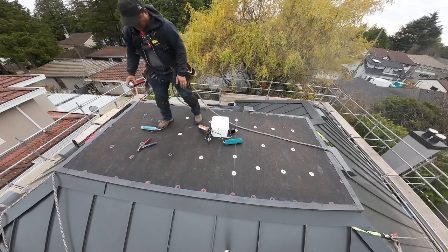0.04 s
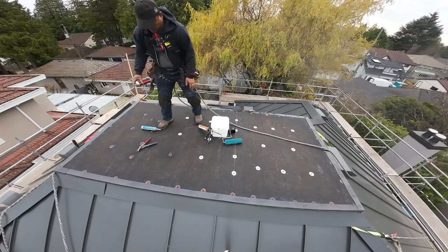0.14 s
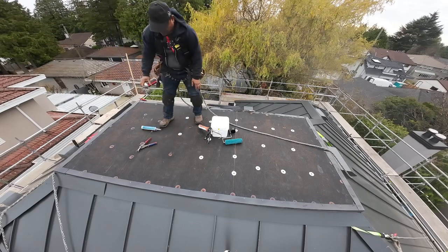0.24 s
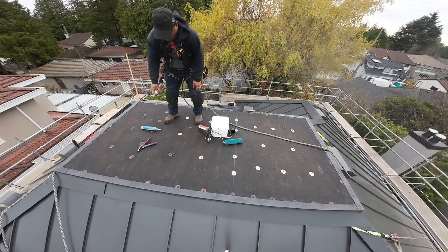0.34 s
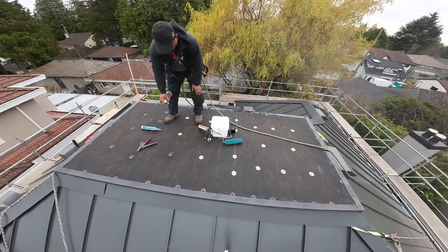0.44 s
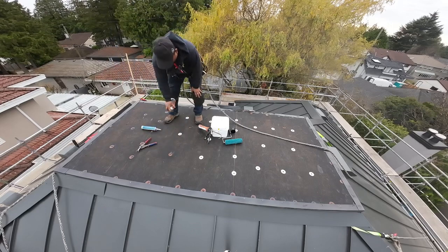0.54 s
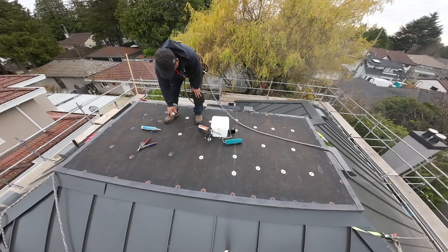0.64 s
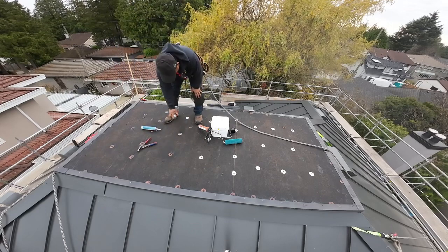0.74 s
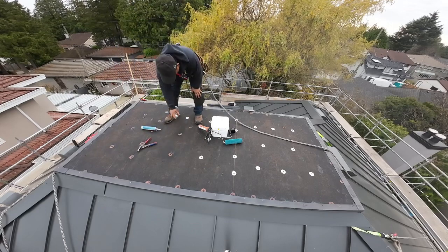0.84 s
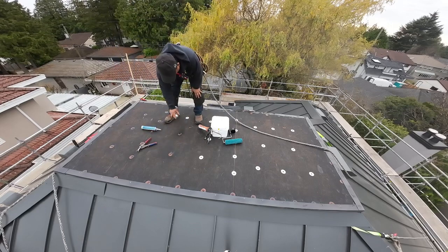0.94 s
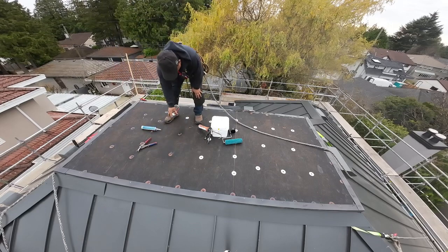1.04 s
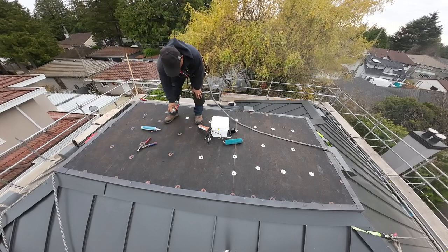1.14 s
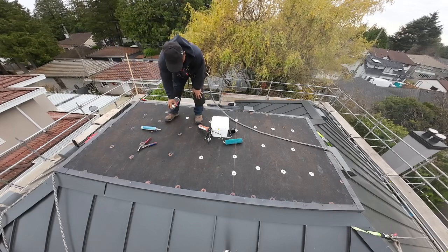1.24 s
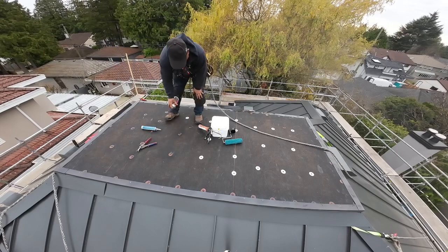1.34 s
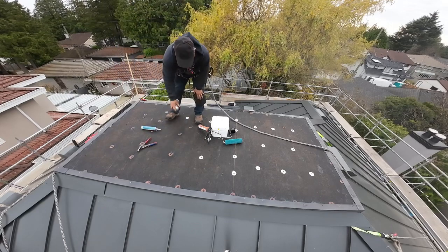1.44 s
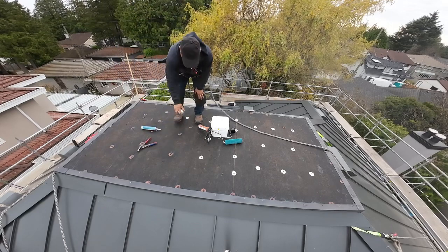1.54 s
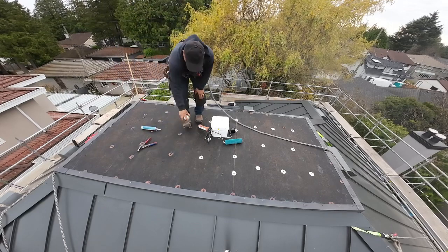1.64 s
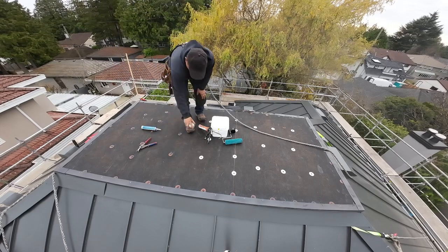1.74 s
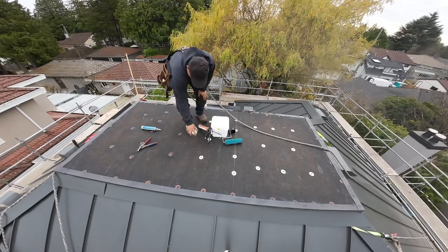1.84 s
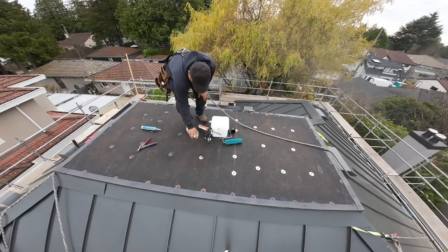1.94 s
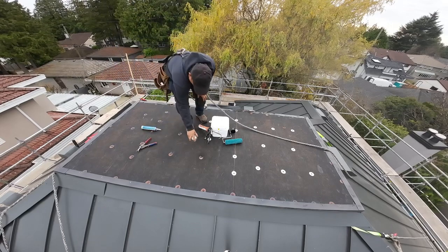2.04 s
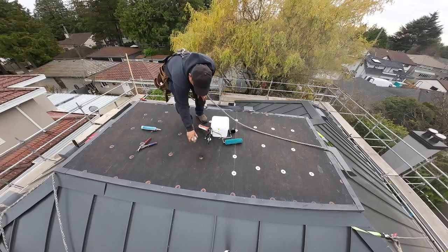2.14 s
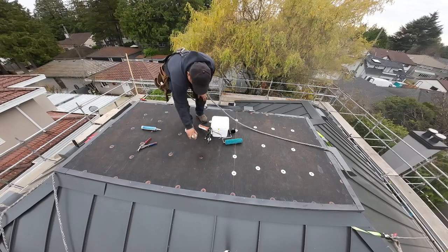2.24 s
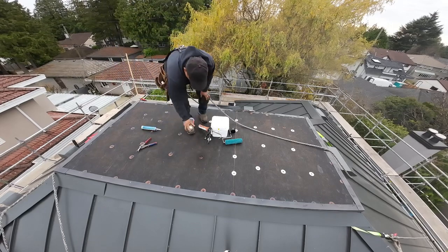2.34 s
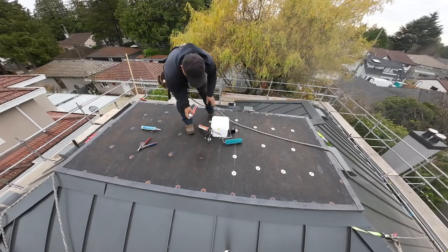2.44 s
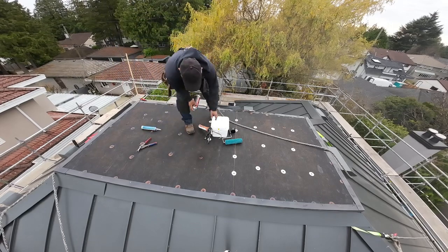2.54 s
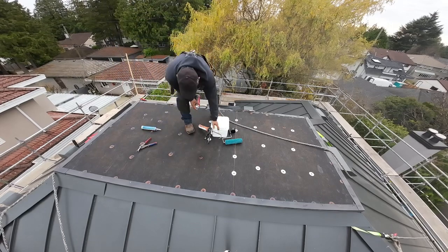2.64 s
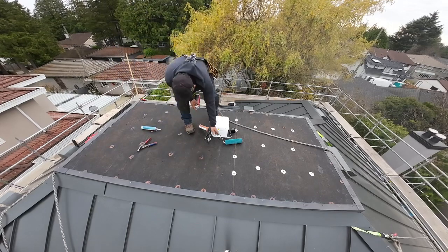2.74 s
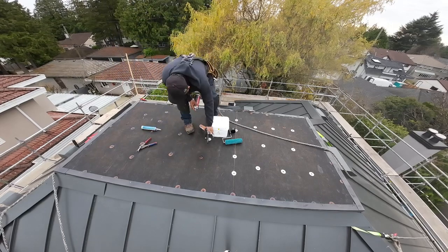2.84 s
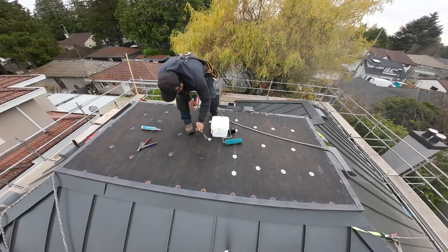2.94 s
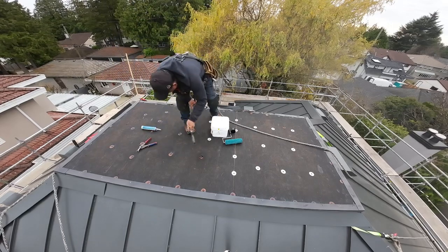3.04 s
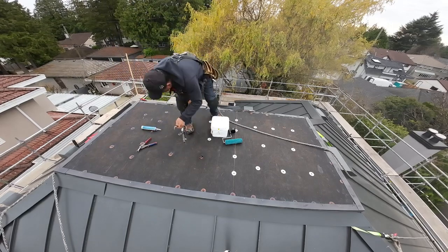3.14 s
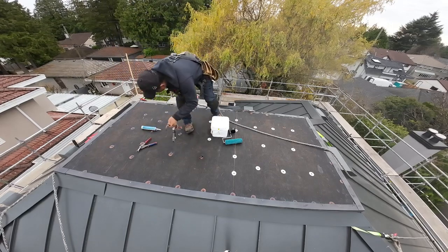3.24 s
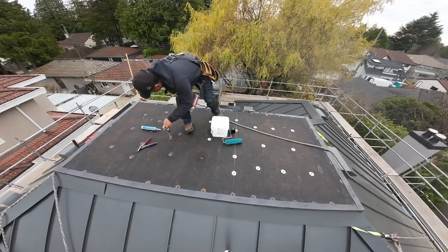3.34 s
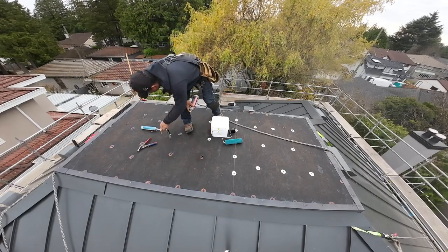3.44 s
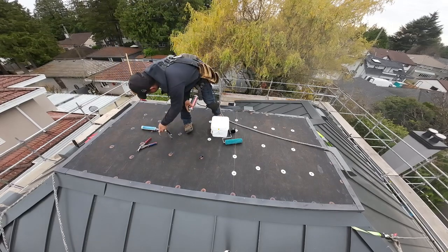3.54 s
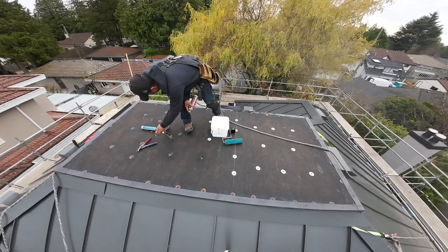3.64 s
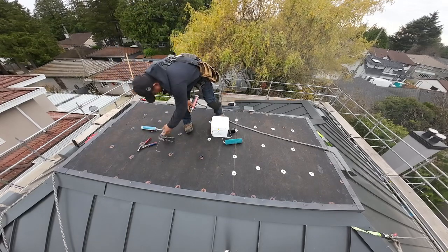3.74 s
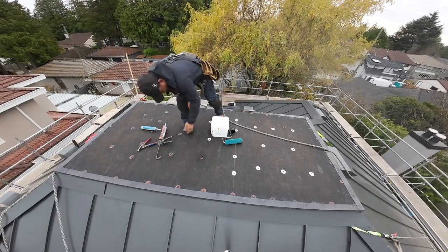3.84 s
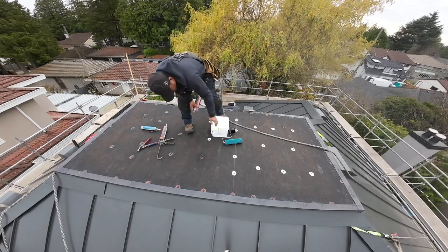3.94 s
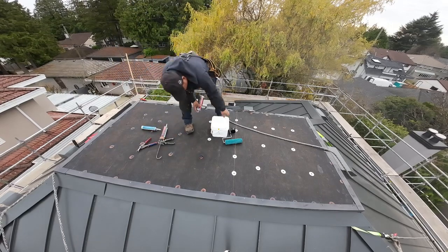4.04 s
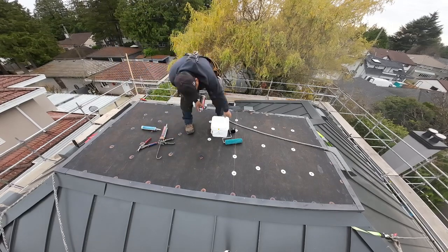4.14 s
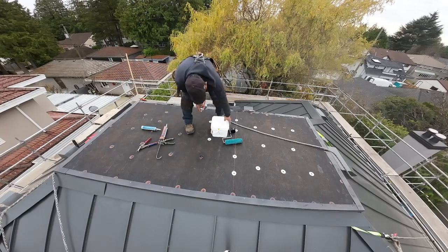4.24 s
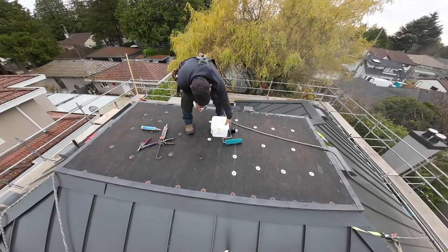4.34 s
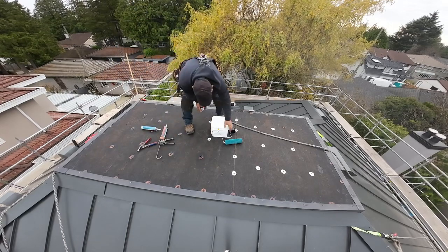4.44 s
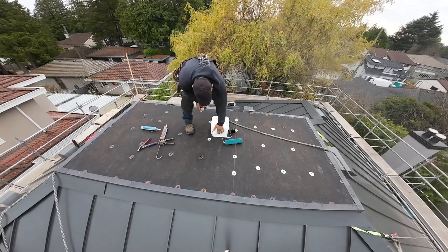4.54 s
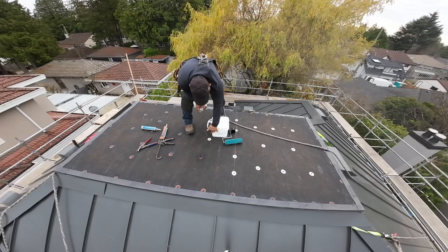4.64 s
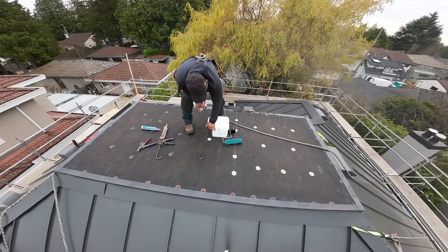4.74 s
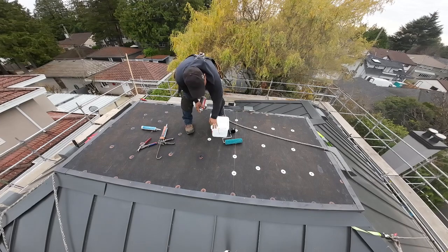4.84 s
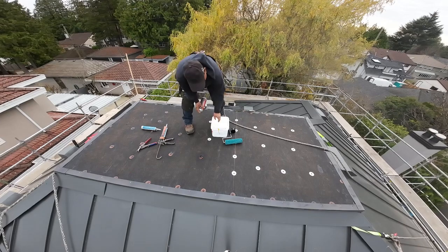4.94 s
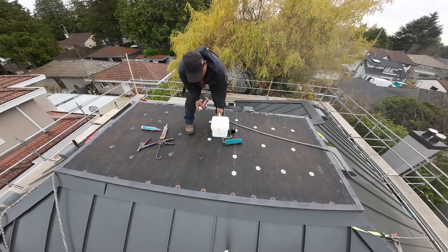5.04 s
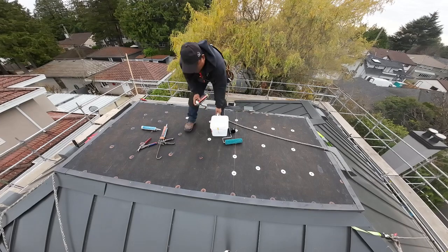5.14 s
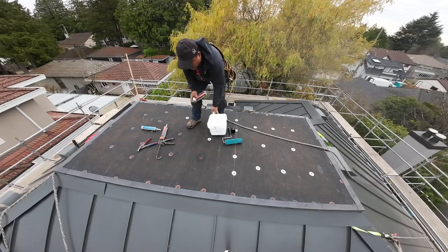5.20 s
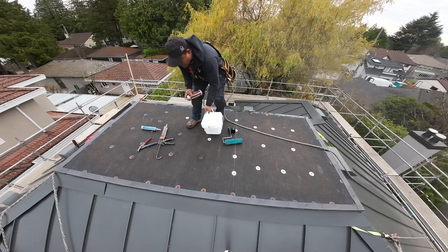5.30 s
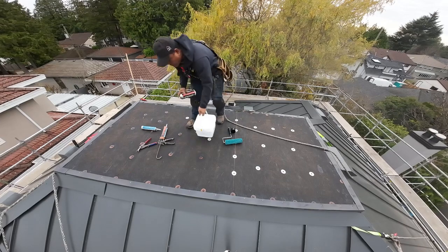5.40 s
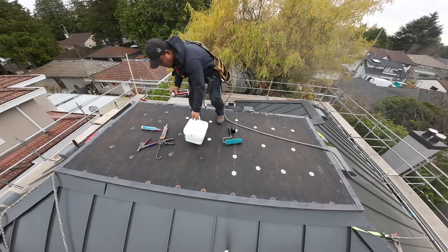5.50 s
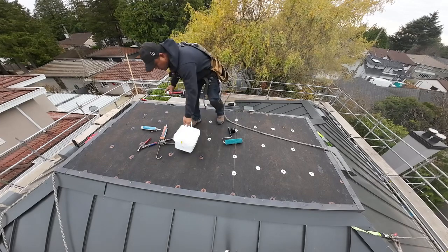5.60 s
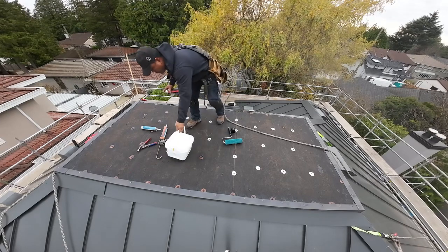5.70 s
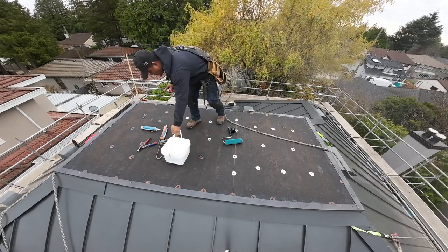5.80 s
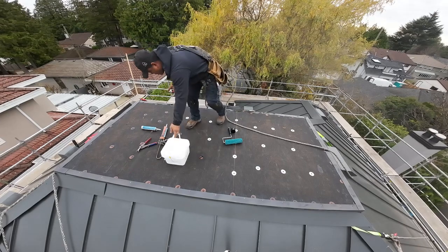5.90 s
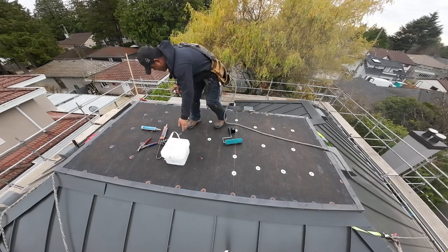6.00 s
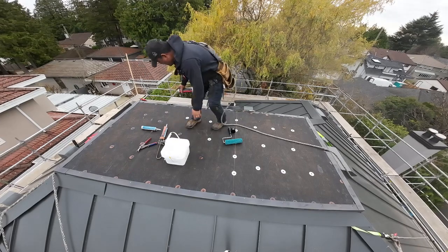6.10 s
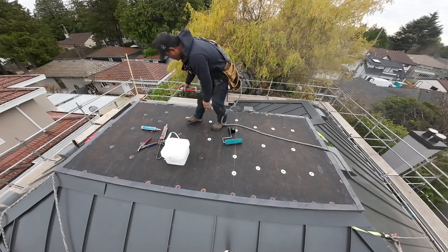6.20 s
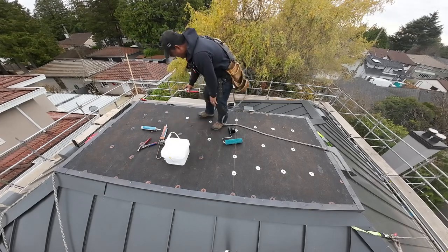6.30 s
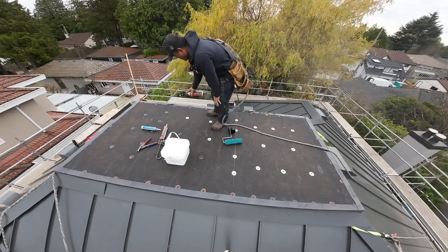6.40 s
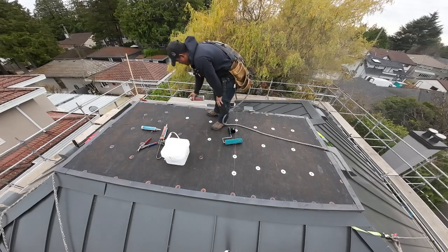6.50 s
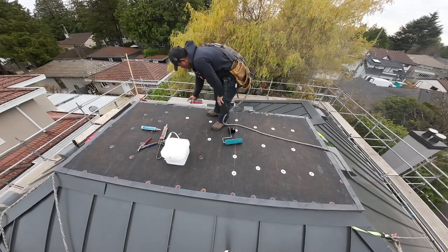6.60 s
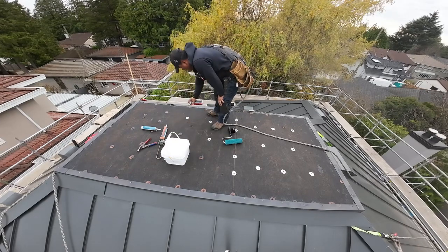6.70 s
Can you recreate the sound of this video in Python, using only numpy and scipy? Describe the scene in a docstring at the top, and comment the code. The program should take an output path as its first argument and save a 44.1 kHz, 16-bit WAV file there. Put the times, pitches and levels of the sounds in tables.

```python
"""A flat felt roof above a town: traffic rumble (shaped noise) and faint machine hum (wavering sines). A
roofer's boots and gear scuff (grainy noise), boots knock a board, steel tools clink (rough tones). A spray can
hisses in short bursts: noise combed by echoes off the roof and the roofer's hand and body. A tool drops and
bounces, and a plastic jug is lifted and set down: friction noise plus damped modes."""
import sys
import numpy as np
from scipy import signal
from scipy.fft import rfft, irfft, next_fast_len
from scipy.io import wavfile
from scipy.ndimage import uniform_filter1d, map_coordinates

SR = 44100
rng = np.random.default_rng(int(sys.argv[2]) if len(sys.argv) > 2 else 0)


def digitize_waveform(pressure):
    """Quantize a signal to 16-bit integers and store it at the path in sys.argv[1].

    Rows of a 2-D input are taken as channels; values are limited to [-1, 1].
    """
    field = np.atleast_2d(pressure).T
    bounded = np.clip(field, -1, 1)
    quanta = np.round(bounded * 32767).astype(np.int16)
    wavfile.write(sys.argv[1], SR, quanta)


N = 298116


def amp(db):
    """Decibels to linear gain."""
    return 10 ** (np.asarray(db) / 20)


def unit(x):
    """Scale to rms 1."""
    return x / np.sqrt(np.mean(x ** 2) + 1e-20)


def clock():
    """Sample times in seconds."""
    return np.arange(N) / SR


def along(points, hz):
    """Interpolate (Hz, value) points on a log frequency axis."""
    point_hz, value = np.transpose(points)
    return np.interp(np.log(hz + 1), np.log(point_hz + 1), value)


def wobble(knots_per_s):
    """Smooth random curve through normally distributed knots."""
    knots = rng.standard_normal(int(N * knots_per_s / SR) + 4)
    return map_coordinates(knots, [np.arange(N) * knots_per_s / SR])


def filtered(x, response):
    """Multiply the spectrum of x by a function of frequency."""
    size = next_fast_len(N + SR // 4)
    spectrum = rfft(x, size) * response(np.fft.rfftfreq(size, 1 / SR))
    return irfft(spectrum, size)[..., :N]


# stereo width: freq_hz, side_minus_mid_db
STEREO_WIDTH = [(25, -17), (70, -18), (140, -27.5), (320, -36.5), (850, -27.5), (2000, -29.5), (4000, -14),
                (7000, -14), (10500, -7)]


def noise(spectrum, grain_db=0, patchy_db=0):
    """Stereo noise, rms 1: grain_db clumps it into tiny slips, patchy_db gives passing colours."""
    z = signal.stft(rng.standard_normal((2, N)), nperseg=512)[2]
    field = uniform_filter1d(rng.standard_normal(z.shape[1:]), size=3, axis=0)
    field = uniform_filter1d(field, size=9, axis=1)
    pair = signal.istft(z * amp(patchy_db * unit(field)), nperseg=512)[1][:, :N]
    pair = pair * amp(grain_db * wobble(400))

    def mid_side_gains(hz):
        angle = np.arctan(amp(along(STEREO_WIDTH, hz)))
        return amp(along(spectrum, hz)) * [np.cos(angle), np.sin(angle)]

    mid, side = filtered(pair, mid_side_gains)
    return unit(np.array([mid + side, mid - side]))


def add(track, start_s, sound):
    """Mix a sound into a track, cut at the track's end."""
    part = track[round(start_s * SR):][:len(sound)]
    part += sound[:len(part)]


def ring(modes, scatter_db):
    """Half a second of damped modes kicked together, strengths redrawn on each call."""
    t = np.arange(SR // 2) / SR
    return sum(amp(db + scatter_db * rng.normal() - 60 * t / t60_s) * np.cos(2 * np.pi * hz * t)
               for hz, db, t60_s in modes)


def blows(hits, modes):
    """Impacts on a modal body; a longer contact pulse excites the high modes less."""
    track = np.zeros(N)
    for start_s, db, contact_s in hits:
        push = np.hanning(max(int(contact_s * SR), 3))
        struck = signal.fftconvolve(ring(modes, scatter_db=1), push / push.sum())
        add(track, start_s, amp(db) * struck)
    return track


def pressure(rows, rise, fall):
    """Contact force: exponential swell and fade, time constants as shares of length_s; powers add."""
    t, power = clock(), np.zeros(N)
    for peak_s, db, length_s in rows:
        near = slice(max(int((peak_s - 4 * length_s) * SR), 0), int((peak_s + 6 * length_s) * SR))
        u = (t[near] - peak_s) / length_s
        envelope = amp(db) * np.exp(np.where(u < 0, u / rise, -u / fall))
        power[near] += envelope ** 2
    return np.sqrt(power)


def scraped(force, modes, spread):
    """Rough contact: noise under the force keeps kicking the modes; spread is the side share."""
    body = ring(modes, scatter_db=1.5)
    kicks = force * rng.standard_normal((2, N))
    mid, side = signal.fftconvolve(kicks, body[None] / np.linalg.norm(body), axes=1)[:, :N]
    return np.array([mid + spread * side, mid - spread * side])


# rasp, grit and hollow body of felt friction: freq_hz, relative_db
FELT_RASP = [(500, -47), (1100, -2), (1600, 1.5), (2600, 2), (3800, -0.5), (4700, -9), (6500, -13),
             (11000, -61)]
FELT_GRIT = [(2500, -33), (4500, 2), (6000, 7), (8000, 3.5), (10500, 5), (12000, -5.5)]
FELT_BODY = [(120, -33), (300, 9.5), (480, 4.5), (650, 0), (950, 3), (1300, 3), (1700, -7), (3000, -37)]


def friction(rows, grit_db, body_db, rise, fall, grain_db, patchy_db):
    """Contact on mineral felt: mid rasp, grit above, hollow body below, under shared pressure."""
    peak_s, db, length_s = np.transpose(rows)[:3]
    total = 0
    for extra_db, colour in ((0, FELT_RASP), (grit_db, FELT_GRIT), (body_db, FELT_BODY)):
        force = pressure(zip(peak_s, db + extra_db, length_s), rise, fall)
        total = total + force * noise(colour, grain_db, patchy_db)
    return total


# town rumble: freq_hz, relative_db
TOWN_SPECTRUM = [(5, -9), (20, -8.5), (35, -3), (70, -1.5), (92, -5.5), (134, -8.5), (200, -14),
                 (332, -18.5), (423, -19.5), (538, -20), (666, -22.5), (895, -24.5), (1300, -31),
                 (1750, -40), (4700, -53.5), (10500, -59), (12000, -63), (15600, -94), (22000, -120)]
# far machines: pitch_hz, level_db, waver_hz
MACHINE_HUM = [(73, -51, 5), (298, -67, 3), (619, -62.3, 1.8), (580, -67, 4.5)]
TOWN_DB, TOWN_SWELL_DB, TOWN_SWELLS_PER_S = -43, 0.5, 2.53


def town():
    """Far traffic as slowly drifting shaped noise; machines as sines wavering in pitch and level."""
    rumble = amp(TOWN_DB + TOWN_SWELL_DB * wobble(TOWN_SWELLS_PER_S)) * noise(TOWN_SPECTRUM)
    hum = 0
    for hz, db, waver_hz in MACHINE_HUM:
        level = amp(db + 2.4 * wobble(3.5)) * np.sqrt(2)  # sine rms to peak
        phase = 2 * np.pi * np.cumsum(hz + waver_hz * wobble(25)) / SR
        hum = hum + level * np.sin(phase)
    return rumble + hum


# scattered tail: freq_hz, t60_s
YARD_DECAY = [(150, 0.88), (1000, 0.096), (4000, 0.19), (11000, 0.12)]


def yard(x):
    """Neighbouring roofs and walls scatter a thin tail: decaying noise after a 12.5 ms gap."""
    hz, t, z = signal.stft(rng.standard_normal((2, SR // 2)), SR, nperseg=256)
    decay = amp(-60 * t / along(YARD_DECAY, hz)[:, None])
    mid, side = signal.istft(z * decay, SR, nperseg=256)[1]
    tail = np.array([mid + 0.11 * side, mid - 0.068 * side]) / np.linalg.norm(mid)
    delayed_tail = np.pad(tail, ((0, 0), (SR // 80, 0)))
    return signal.fftconvolve(x, delayed_tail, axes=1)[:, :N]


# frame shudders: peak_s, level_db, length_s
JOIST_SHUDDERS = [(3.89, -33.5, 0.22), (5.96, -34, 0.15)]
# joist spectrum: freq_hz, relative_db
JOIST_SPECTRUM = [(30, -19), (60, 12.5), (100, -0.5), (190, 0.5), (300, -13), (450, -14.5), (1000, -64)]


def joists():
    """The roof's frame grumbles briefly around the heavy blows: low noise under short swells."""
    return pressure(JOIST_SHUDDERS, rise=0.23, fall=0.69) * noise(JOIST_SPECTRUM)


# microphone mount modes: freq_hz, relative_db, t60_s
MOUNT_MODES = [(34.8, -14, .6), (62.2, -8, 0.94), (80.7, -4.5, 1), (154, -14.5, 0.6)]
MOUNT_LAG_S, MOUNT_DECK_DB, MOUNT_JUG_DB = 0.0472, -17.5, -21


def mount():
    """Heavy blows cross the roof and, a moment later, rock the microphones in opposite phase."""
    deck_sway = amp(MOUNT_DECK_DB) * blows(DECK_THUMPS, MOUNT_MODES)
    jug_sway = amp(MOUNT_JUG_DB) * blows(JUG_HITS, MOUNT_MODES)
    sway = np.zeros(N)
    add(sway, MOUNT_LAG_S, deck_sway + jug_sway)
    return sway * np.array([[1], [-1]])


# boots shifting weight: peak_s, level_db, length_s
BOOT_SHUFFLES = [(2.222, -46, 0.021), (2.595, -50, 0.19), (2.72, -43, 0.034), (4.92, -50, 0.088)]
# deck under a shuffling boot: freq_hz, relative_db
HOLLOW_DECK = [(130, -17), (270, 6), (400, 0.5), (600, -2), (900, -8), (1500, -39)]
# boot on a board: peak_s, level_db, length_s
BOARD_KNOCKS = [(2.706, -46, .011), (2.727, -37.5, 0.014)]
# board modes: freq_hz, relative_db, t60_s
BOARD_MODES = [(453, 4, 0.079), (640, -12, .05), (810, 7, 0.05), (920, 1, 0.065)]


def knocks():
    """Shifting boots shuffle as hollow grainy noise and knock dully on a modal board."""
    shuffle = pressure(BOOT_SHUFFLES, rise=0.56, fall=0.46) * noise(HOLLOW_DECK, grain_db=3.0)
    knock = scraped(pressure(BOARD_KNOCKS, rise=0.4, fall=0.5), BOARD_MODES, spread=.04)
    return shuffle + knock


# rummaging: start_s, end_s, relative_db
FIDGET_SPELLS = [(.3, 0.626, -89), (1.66, 1.92, -63.5), (2.05, 2.18, -68.5), (2.85, 2.96, -65),
                 (3.08, 3.295, -63.5), (3.48, 3.658, -67), (4.32, 4.361, -64.5), (4.8, 5.13, -64.5),
                 (6.07, 6.25, -64), (6.54, 6.66, -72.5)]
FIDGETS_PER_S, FIDGET_S, FIDGET_SCATTER_DB, FIDGET_GRIT_DB = 33, 0.036, 1.8, -8
FIDGET_UNEVEN = 0.38  # timing scatter, share of the gap


def fidgets():
    """Faint scuffs, unevenly spaced through each spell, as rows like those of BOOT_SCUFFS."""
    slot_s = np.arange(0, N / SR, 1 / FIDGETS_PER_S)
    shift, loud, gritty = rng.standard_normal((len(slot_s), 3)).T
    rows = np.column_stack([slot_s + FIDGET_UNEVEN * shift / FIDGETS_PER_S,
                            FIDGET_SCATTER_DB * loud,
                            np.full(len(slot_s), FIDGET_S),
                            FIDGET_GRIT_DB + FIDGET_SCATTER_DB * gritty])
    return np.vstack([rows[(slot_s >= start_s) & (slot_s < end_s)] + [0, db, 0, 0]
                      for start_s, end_s, db in FIDGET_SPELLS])


# boots and gear: peak_s, relative_db, length_s, grit_db
BOOT_SCUFFS = [(.225, -61.5, 0.024, -1.5), (.277, -51, 0.017, -16), (.378, -51.5, 0.024, -5),
               (.529, -55.5, 0.054, -12), (.681, -58, 0.026, -3), (.808, -53.5, 0.037, -26),
               (1.26, -66.5, .035, -14), (1.312, -69, .008, -18), (1.642, -55, 0.035, -13),
               (1.73, -67, 0.013, 4.5), (1.794, -56, 0.031, -6), (2.03, -56, 0.02, -4),
               (2.199, -51.5, 0.031, -21), (2.43, -71, 0.054, -0.5), (2.725, -59.5, 0.09, -23),
               (2.768, -52, 0.052, -22), (2.841, -50.5, 0.031, -11.5), (2.962, -59, 0.029, -43),
               (3.048, -48, 0.025, 3.5), (3.115, -59, 0.012, 0.5), (3.153, -50, 0.013, -8),
               (3.19, -55, 0.03, -21), (3.222, -60.5, 0.02, 1.5), (3.25, -66, 0.027, -3),
               (3.352, -59, 0.011, -9), (3.423, -49, 0.044, -6.5), (3.67, -45, 0.028, -6.5),
               (4.26, -69, 0.018, -6), (4.454, -53.5, 0.029, -17), (4.524, -53.5, 0.057, -23),
               (4.647, -46, 0.023, -13), (4.729, -40.5, 0.034, -10.5), (4.778, -47, 0.033, -19),
               (4.85, -61, 0.06, -25), (5.02, -54, 0.014, -15), (5.115, -58, 0.019, -20),
               (5.148, -53, 0.026, -12.5), (5.238, -51.5, 0.024, -5.5), (5.259, -46, 0.015, -9.5),
               (5.432, -54, 0.0074, 0.5), (5.826, -56.5, 0.019, -9), (5.927, -45.5, .016, -27),
               (5.968, -55.5, 0.022, -3), (6.011, -45, 0.018, -14), (6.029, -45.5, 0.023, -15),
               (6.225, -55.5, 0.027, -13), (6.295, -62.5, 0.023, -4), (6.45, -51, 0.018, -4.5),
               (6.515, -69, 0.025, 5.5)]
SCUFF_GAIN_DB = 2.5
SOLE_DB, SOLE_PER_GRIT = -7.5, 0.41  # a flat sole sounds hollow: less grit, more body


def roofer():
    """Boots and gear rub as felt friction; a faint rustle of clothes, always there, rises and falls."""
    rustle = amp(-78 + 4 * wobble(7)) * noise(FELT_RASP, grain_db=2)
    scuffs = np.vstack([BOOT_SCUFFS, fidgets()])
    grit_db = scuffs[:, 3]
    body_db = SOLE_DB - SOLE_PER_GRIT * grit_db
    rubbing = friction(scuffs, grit_db, body_db, rise=0.43, fall=0.63, grain_db=1.0, patchy_db=3)
    return amp(SCUFF_GAIN_DB) * rubbing + rustle


# sliding steel: peak_s, level_db, length_s
STEEL_CLINKS = [(2.764, -45, 0.02), (2.792, -51.5, 0.026), (4.521, -44, 0.022), (4.595, -57.5, 0.031)]
# steel tones: pitch_hz, relative_db, waver_hz
STEEL_TONES = [(2640, 0, 48), (3860, -5, 70), (5860, -8, 110)]


def clinks():
    """Steel sliding on steel sings on a few rough, wavering tones while pressed."""
    tones = 0
    for hz, db, waver_hz in STEEL_TONES:
        level = amp(db + 3.5 * wobble(150))
        phase = 2 * np.pi * np.cumsum(hz + waver_hz * wobble(400)) / SR
        tones = tones + level * np.sin(phase)
    return pressure(STEEL_CLINKS, rise=0.27, fall=0.85) * unit(tones)


# bursts: start_s, end_s, relative_db, first_lag_ms, middle_lag_ms, last_lag_ms
SPRAY_BURSTS = [(0.638, 1.076, -58, 0.83, 0.74, 0.83), (1.867, 2.311, -54.5, 1.1, 0.84, 0.85),
                (6.674, 6.915, -57.5, 0.98, 0.54, 0.7)]
# nozzle hiss: freq_hz, relative_db
JET_SPECTRUM = [(800, -32), (2000, -4.5), (3500, 2.5), (5000, -2), (7000, 1), (9000, 0), (10500, 10),
                (11500, 9.5), (13000, -41)]
# echoes off the roof, then off the hand and body: lag_multiple, gain
SPRAY_ECHOES = [(1, .48), (2.7, .42)]


def spray(press_s=0.026, release_s=0.023, swell_db=1.1, sputter_db=.5):
    """A nozzle opens gradually and sputters; echoes off the roof and the hand and body comb its hiss, gliding
    as the hand moves."""
    t, out = clock(), np.zeros((2, N))
    jet = noise(JET_SPECTRUM, grain_db=1, patchy_db=2)
    for start_s, end_s, db, *lags_ms in SPRAY_BURSTS:
        glide_ms = np.interp(t, np.linspace(start_s, end_s, len(lags_ms)), lags_ms)
        lag_s = (glide_ms + .009 * wobble(12)) / 1000
        opening = .5 + .5 * np.tanh((t - start_s) / press_s)
        closing = np.clip((end_s - t) / release_s + .5, 0, 1)
        bounced = 0
        for multiple, gain in SPRAY_ECHOES:
            position = (t - multiple * lag_s) * SR
            bounced = bounced + gain * np.array([map_coordinates(side, [position]) for side in jet])
        level = amp(db + np.interp(t, [start_s, end_s], [-swell_db, 0]))
        out += level * opening * closing * (jet + bounced)
    return out * amp(sputter_db * wobble(45))


# handle creaks: peak_s, level_db, length_s
JUG_GRIPS = [(4.647, -35.5, 0.0083), (4.722, -33, 0.013), (4.74, -36.5, 0.034)]
# thin plastic wall: freq_hz, relative_db, t60_s
PLASTIC_MODES = [(1030, -3, .04), (1430, 5, 0.045), (1600, 4, .04), (1850, 3, .025), (2090, 6, 0.04),
                 (2400, 2, .02), (2650, 6, 0.03), (3450, 2, .02), (3800, 6, 0.028), (3980, 4, 0.04),
                 (5100, 2, 0.012)]
# base grating on felt: peak_s, level_db, length_s
JUG_RUBS = [(5.908, -37, 0.016), (5.924, -30.5, 0.027), (5.962, -40.5, 0.018)]
# base rub spectrum: freq_hz, relative_db
JUG_BASE = [(150, -20), (300, 9.5), (500, 1), (1150, 0.5), (1500, -8), (2100, -7.5), (2500, -18),
            (3300, -11.5), (4300, -30), (6500, -37), (11000, -40)]
# jug landing, edge first: start_s, relative_db, contact_s
JUG_HITS = [(5.922, -32, 0.0013), (5.93, -13.5, 0.0087), (5.942, -29, 0.0028), (5.956, -26, 0.0026),
            (5.966, -30, 0.0025)]
# jug and its load: freq_hz, relative_db, t60_s
JUG_MODES = [(39.7, -11, 0.47), (76, -5.5, 0.053), (143, -3.5, 0.044), (202, 5, 0.064), (293, -7.5, 0.095),
             (347, -5, 0.087), (448, -17, 0.07), (612, -14, .08)]
JUG_BOOM_DB = 1.5


def jug():
    """Plastic creaks in the hand (scraped modes), the base grates, then blows ring the loaded jug."""
    creak = scraped(pressure(JUG_GRIPS, rise=0.45, fall=0.28), PLASTIC_MODES, spread=0.023)
    grate = pressure(JUG_RUBS, rise=0.29, fall=0.62) * noise(JUG_BASE, grain_db=-0.5)
    return creak + grate + amp(JUG_BOOM_DB) * blows(JUG_HITS, JUG_MODES)


# hard contacts: peak_s, relative_db, length_s, grit_db, body_db, ring_db
TOOL_CLACKS = [(3.798, -41, 0.015, 0, -0.5, -14), (3.849, -24, 0.01, -1, 3, 2),
               (3.875, -44.5, 0.015, -4.5, 10.5, -17), (3.925, -34, 0.01, -2, -2.5, -15),
               (3.944, -44, 0.028, -9, 0, -17), (3.984, -48.5, 0.014, 5.5, 7, -11),
               (4.007, -33.5, 0.014, -3.5, 2, -7)]
# dropped tool: freq_hz, relative_db, t60_s
TOOL_MODES = [(747, -3, 0.05), (932, 6, 0.05), (1134, 4, 0.055), (1228, 5, 0.04), (1692, 1, 0.04),
              (1939, 0, 0.05), (2239, -4, 0.05), (2347, -4, 0.05), (2665, -2, 0.05), (3080, -2, 0.04),
              (3348, -2, .05), (3980, -6, .05), (4170, -5, .05), (5950, -2, .025)]
# tool landings and separate dull footfalls: start_s, level_db, contact_s
DECK_THUMPS = [(2.226, -34, 0.0051), (3.672, -27.5, 0.0062), (3.846, -12, 0.0017), (3.921, -32, 0.0017),
               (3.941, -24.5, 0.0036), (4.006, -34, 0.0026), (5.245, -25, 0.0125)]
# hollow deck: freq_hz, relative_db, t60_s
DECK_MODES = [(44, -3, 0.046), (151, -8, 0.2), (176, 0.5, 0.13), (185, -15, 0.16), (219, -11, 0.048),
              (261, -7, 0.14), (325, -26, 0.064), (420, -12, 0.057), (510, -17, .07), (560, -15, 0.14)]


def dropped_tool():
    """A tool clatters, skids and rings; its landings and separate dull footfalls boom the hollow deck."""
    peak_s, db, length_s, grit_db, body_db, ring_db = np.transpose(TOOL_CLACKS)
    clatter = friction(TOOL_CLACKS, grit_db, body_db, rise=0.66, fall=0.59, grain_db=0.5, patchy_db=1.0)
    skid_force = pressure(zip(peak_s - .003, db + ring_db, length_s), rise=.4, fall=.2)
    skid = scraped(skid_force, TOOL_MODES, spread=.13)
    hits = [(when_s - .001, hit_db, .0002) for when_s, hit_db in zip(peak_s, db + ring_db)]
    strike = blows(hits, TOOL_MODES)
    boom = blows(DECK_THUMPS, DECK_MODES)
    return amp(-0.5) * clatter + skid + amp(-4.0) * strike + boom


# level between ears: freq_hz, left_minus_right_db
EAR_BALANCE = [(400, 1), (2000, -0.9), (3700, 1.8), (6700, -0.5), (11000, -2)]
# phase between ears: freq_hz, left_lead_rad
EAR_LEAD = [(4000, 0), (6500, 0.78), (8300, 0.21), (10000, 0.91), (12000, 1.6)]


def ears(x):
    """The body between the two microphones gives each its own level and phase, by frequency."""
    half = np.array([[.5], [-.5]])

    def response(hz):
        gain = amp(half * along(EAR_BALANCE, hz))
        return gain * np.exp(1j * half * along(EAR_LEAD, hz))

    return filtered(x, response)


def scene():
    """Work sounds, their faint echo, the shaking roof and the town."""
    work = ears(roofer() + dropped_tool() + jug() + knocks() + clinks() + spray())
    return work + amp(-26.5) * yard(work) + joists() + mount() + town()


CEILING, TOP_HZ = .68, 11800


def record(dry):
    """Saturate the peaks smoothly below the ceiling, then low-pass very steeply."""
    held = dry / (1 + (dry / CEILING) ** 6) ** (1 / 6)
    return filtered(held, lambda hz: 1 / np.sqrt(1 + (hz / TOP_HZ) ** 160))


dry = scene()
out = record(dry)
digitize_waveform(out)
```